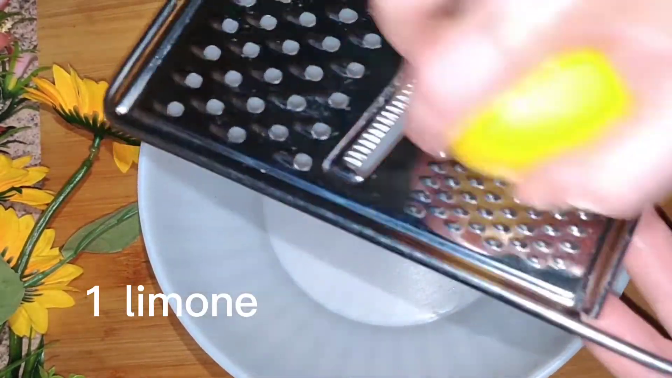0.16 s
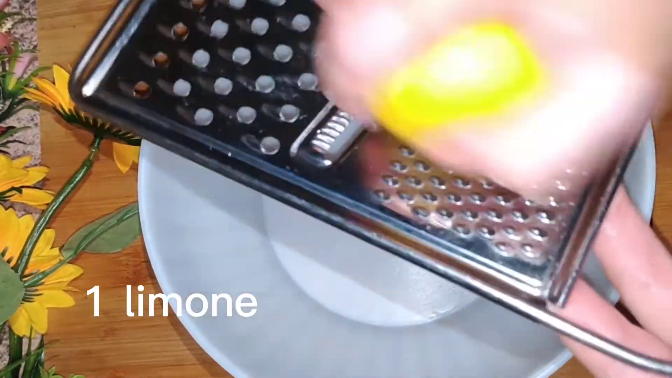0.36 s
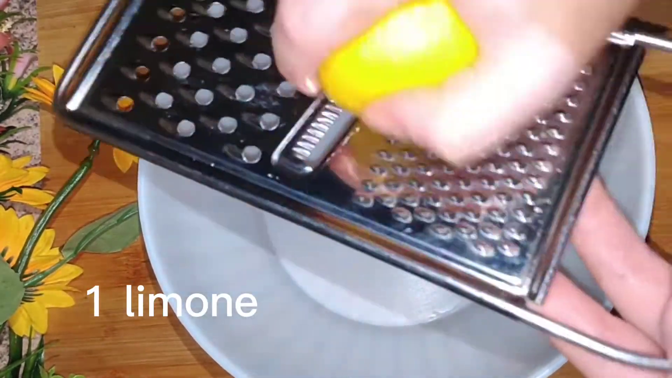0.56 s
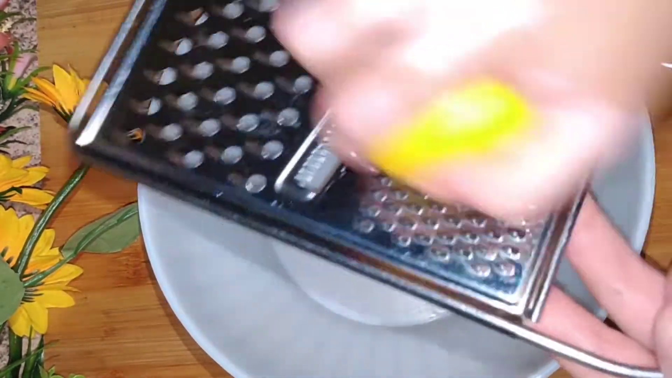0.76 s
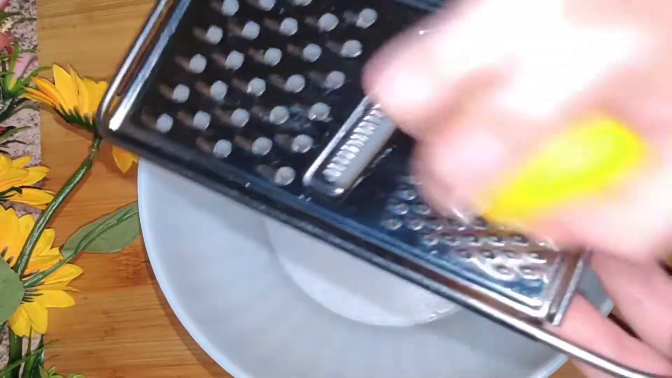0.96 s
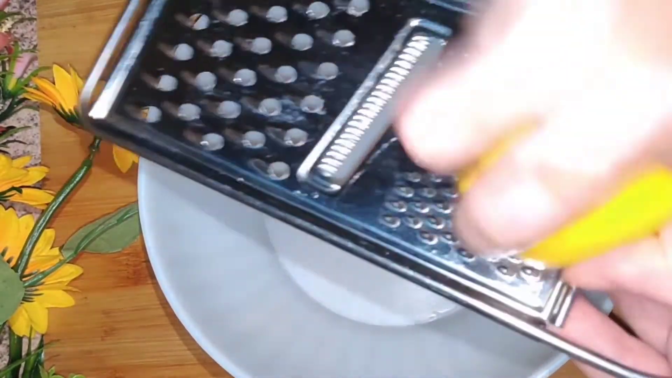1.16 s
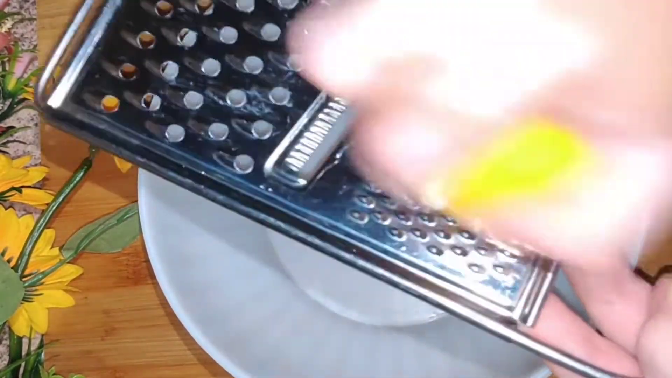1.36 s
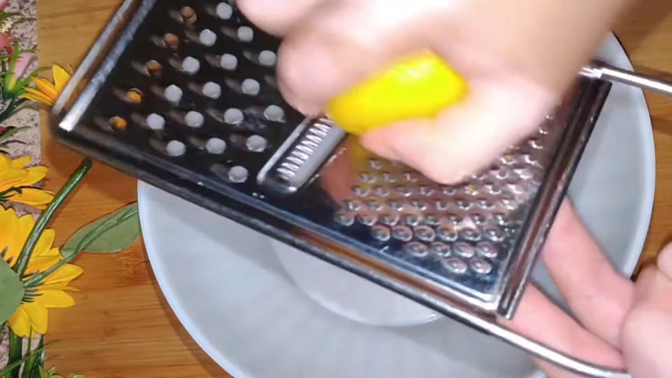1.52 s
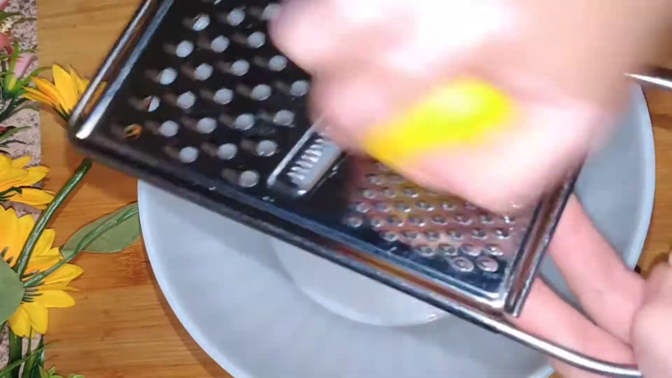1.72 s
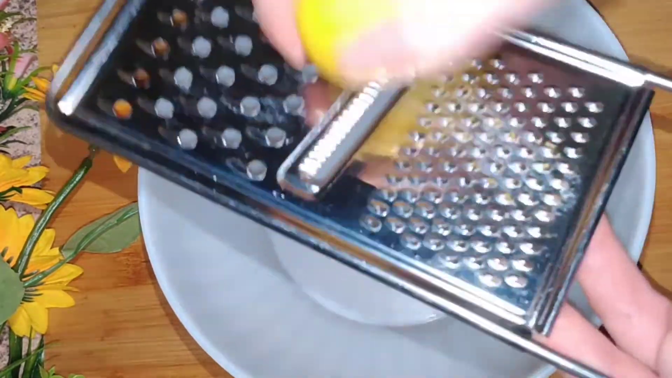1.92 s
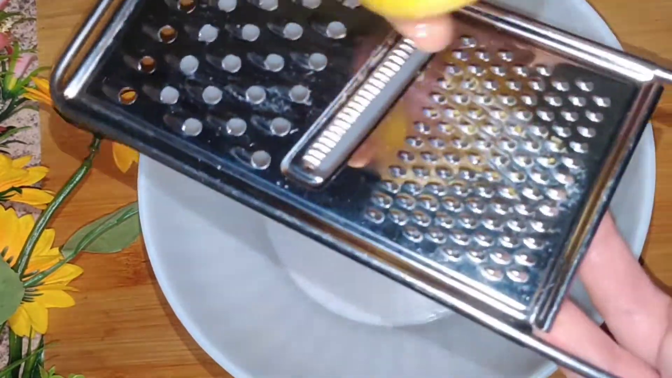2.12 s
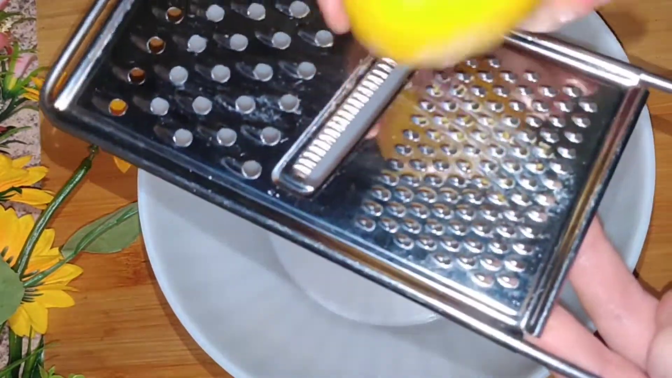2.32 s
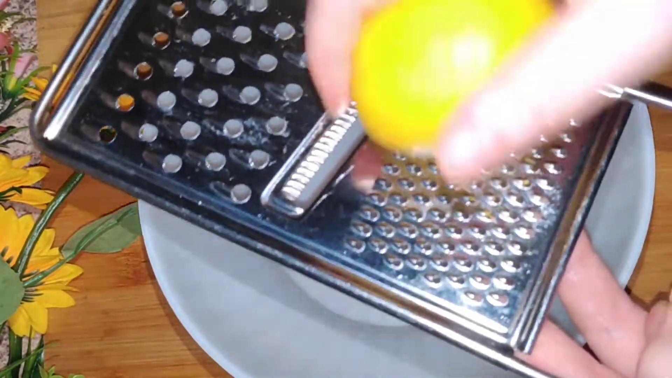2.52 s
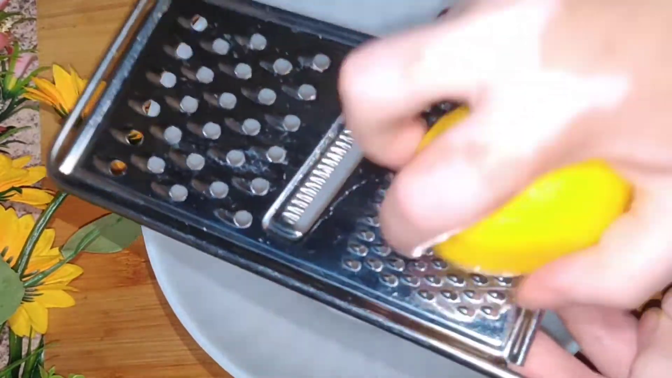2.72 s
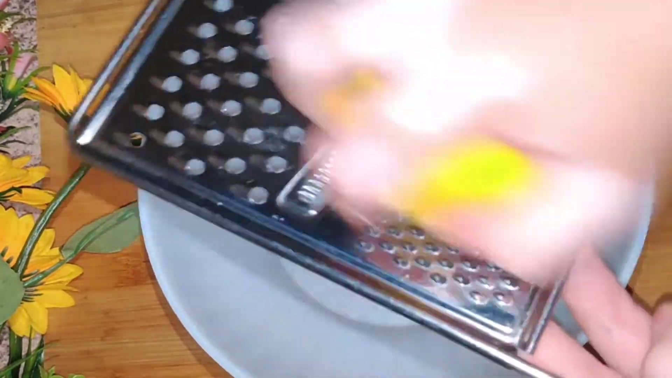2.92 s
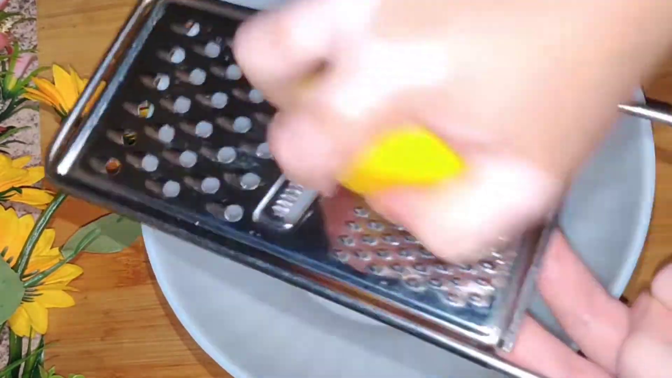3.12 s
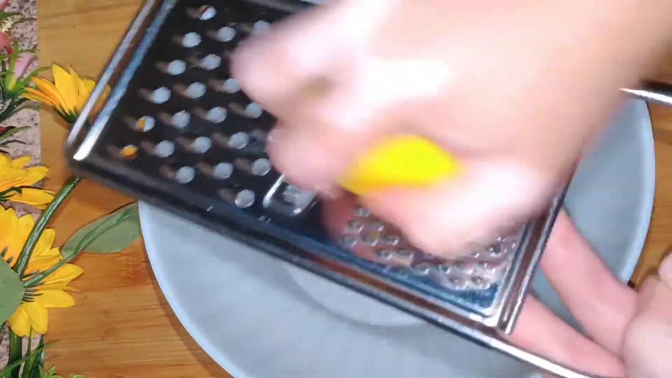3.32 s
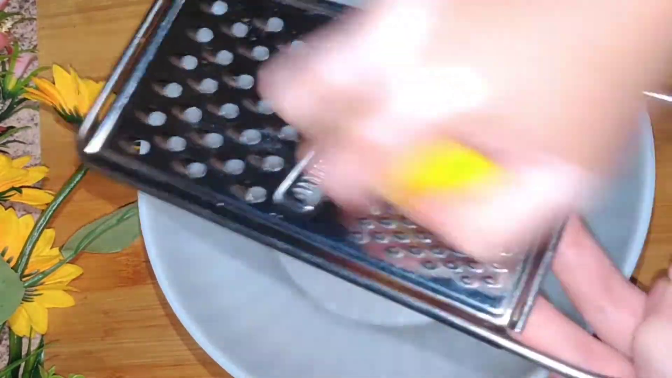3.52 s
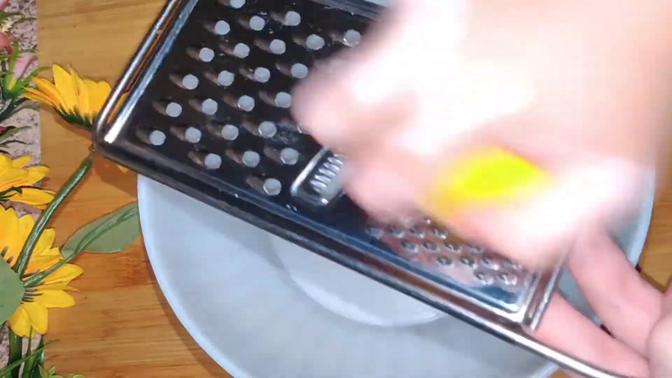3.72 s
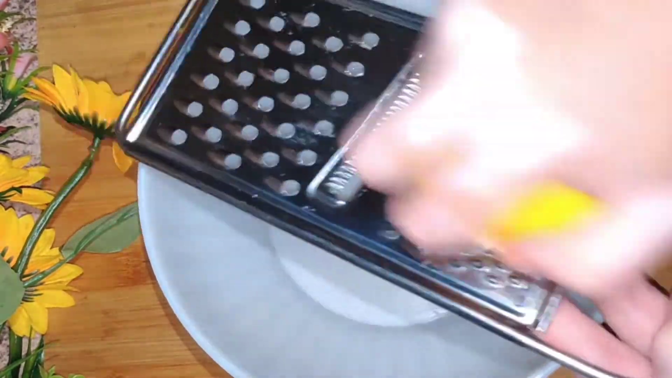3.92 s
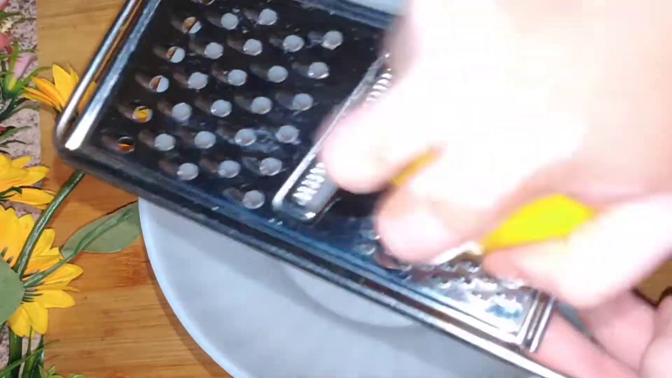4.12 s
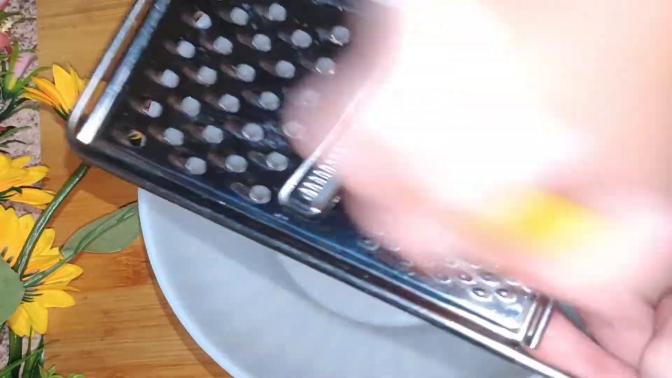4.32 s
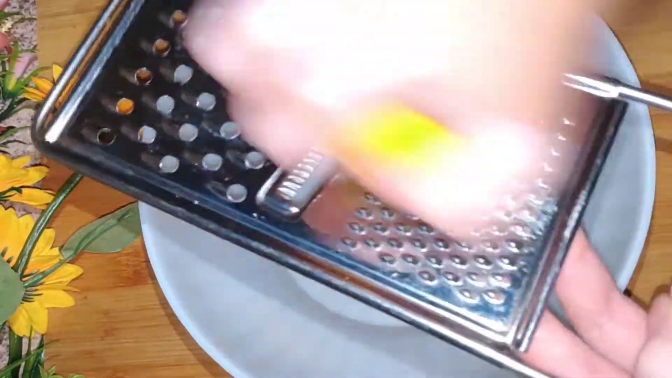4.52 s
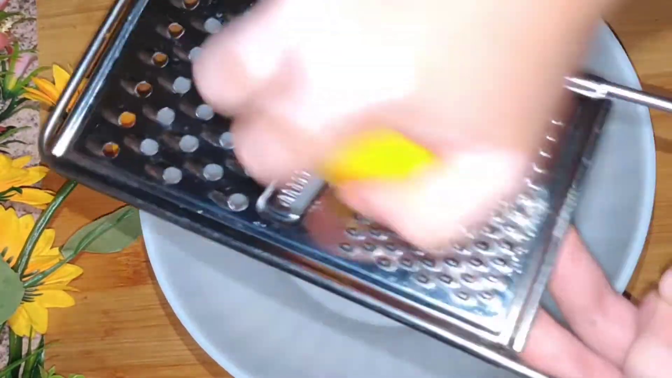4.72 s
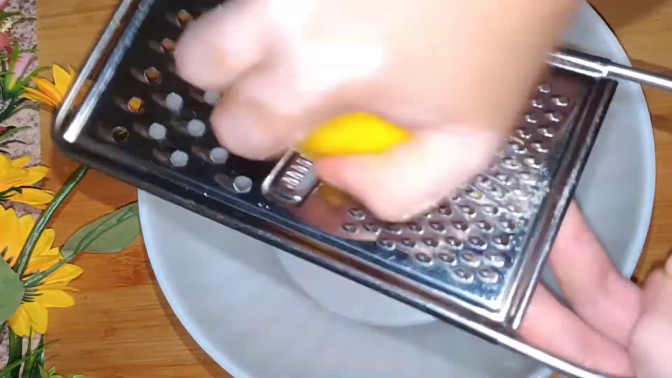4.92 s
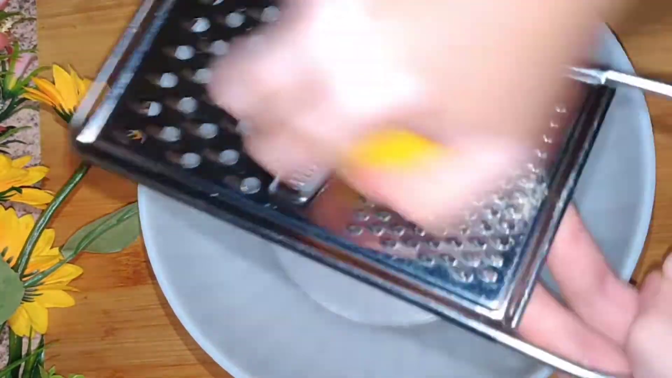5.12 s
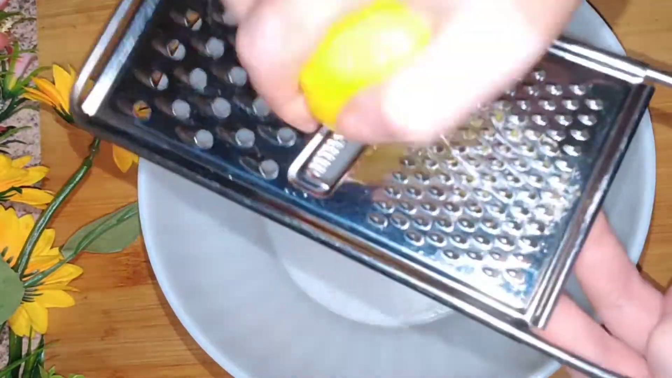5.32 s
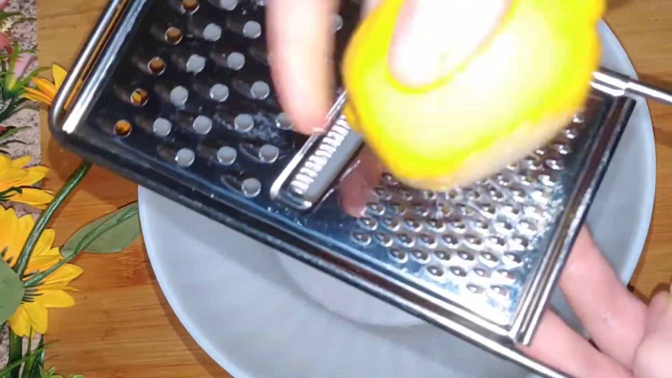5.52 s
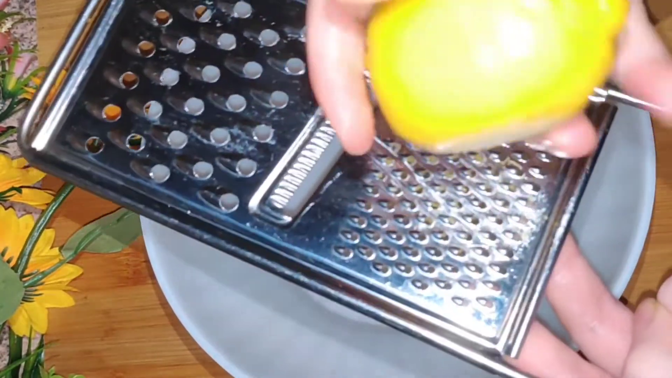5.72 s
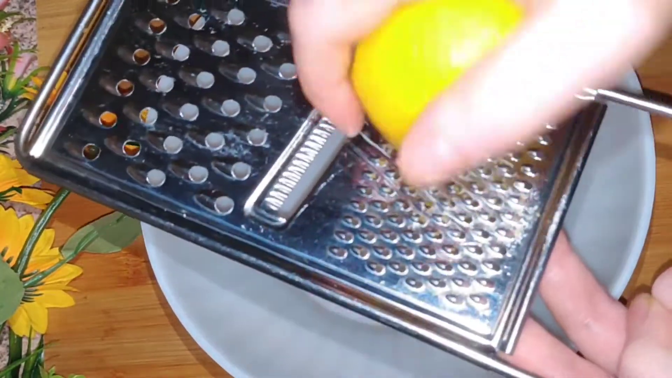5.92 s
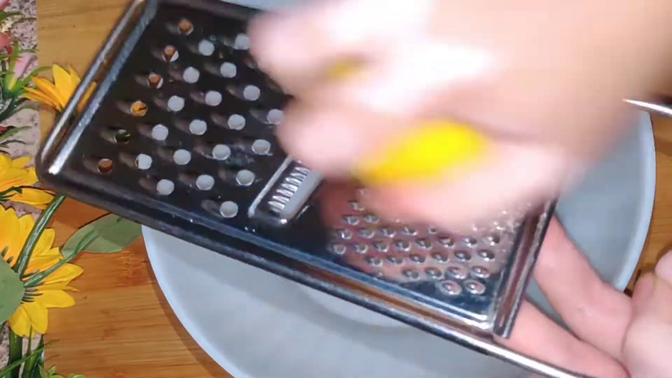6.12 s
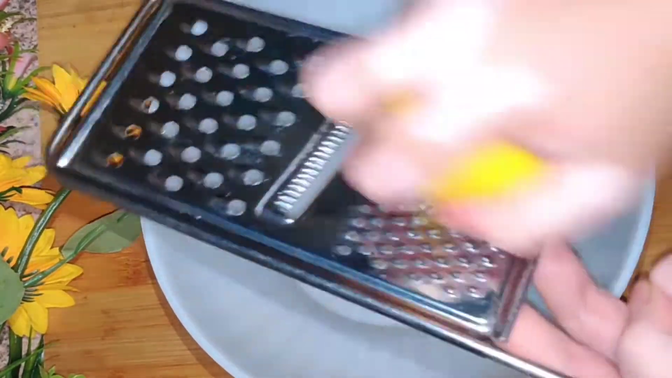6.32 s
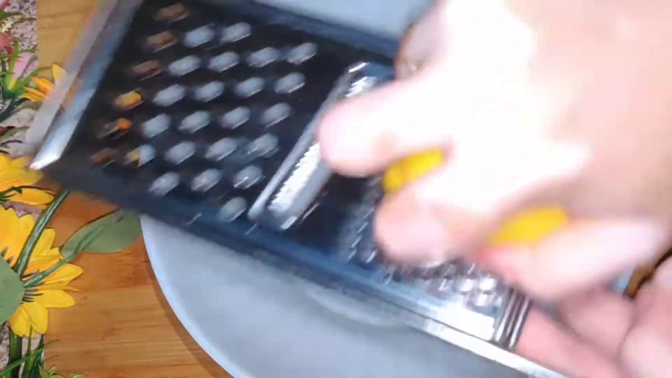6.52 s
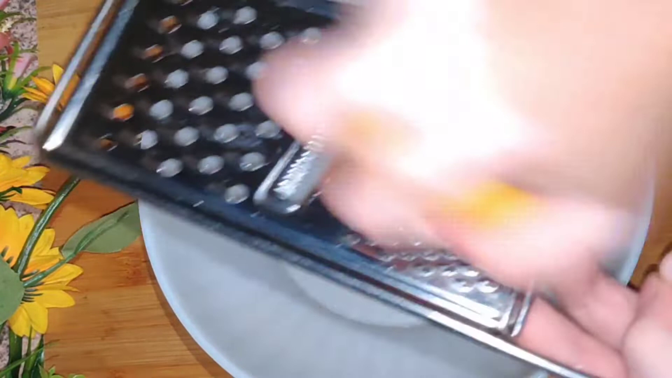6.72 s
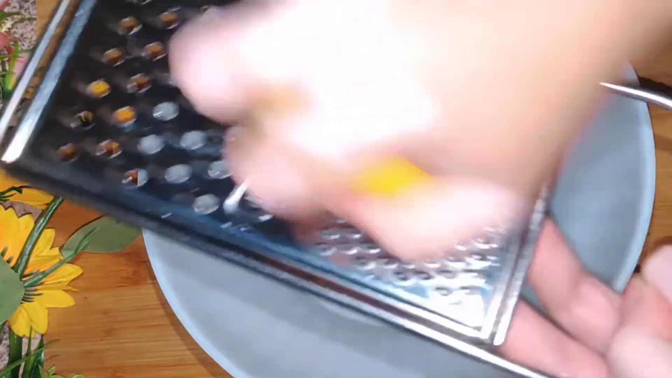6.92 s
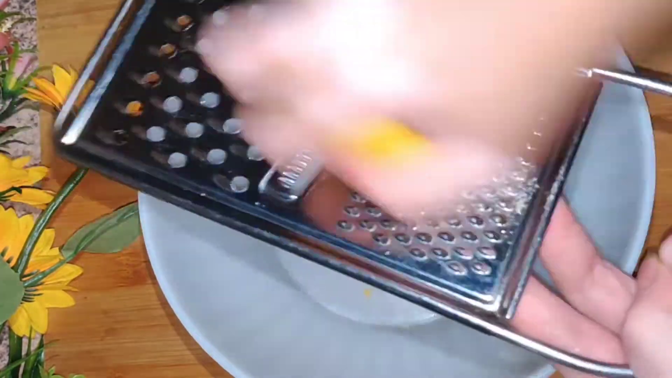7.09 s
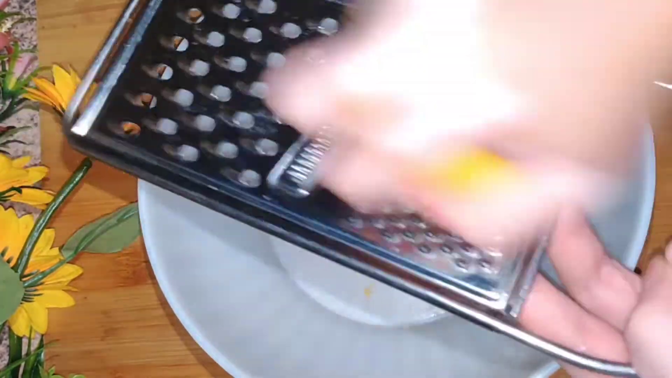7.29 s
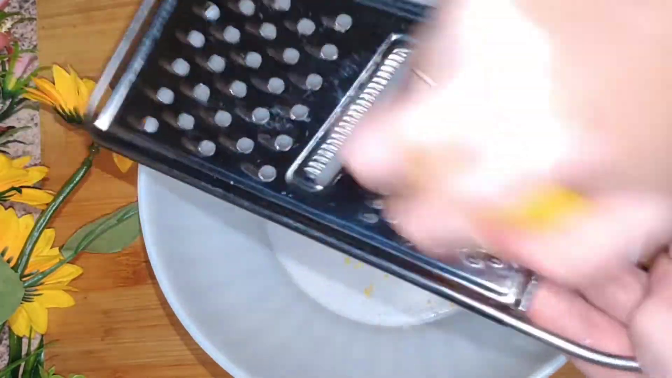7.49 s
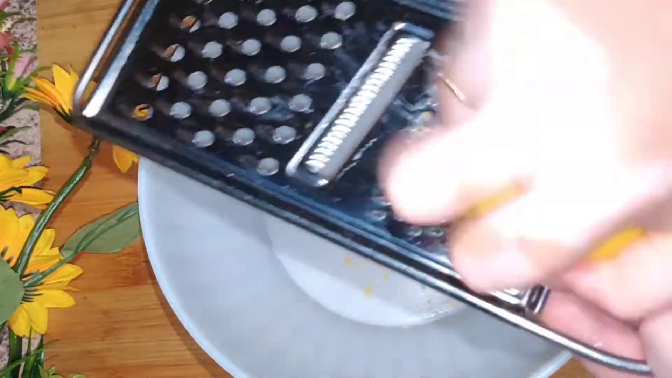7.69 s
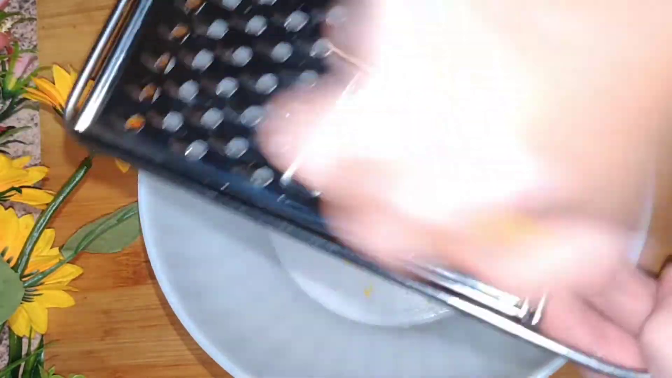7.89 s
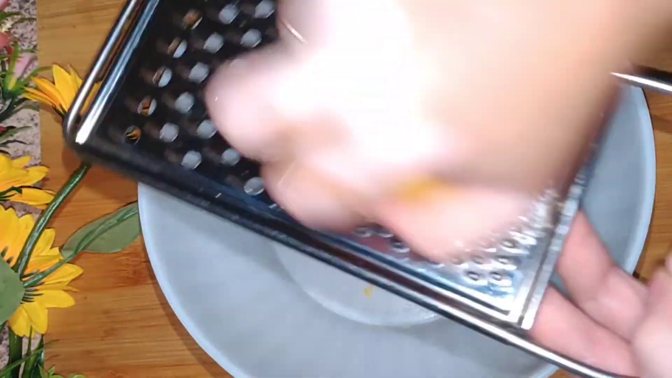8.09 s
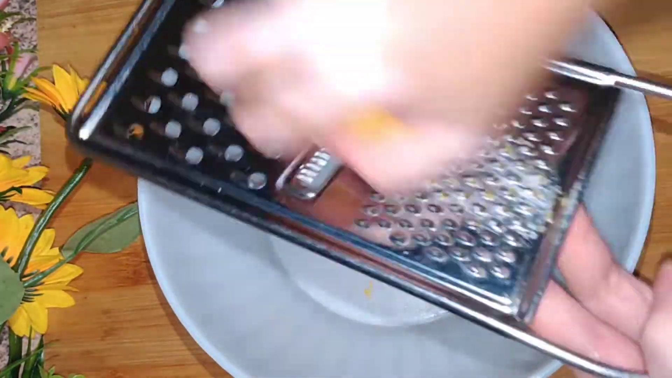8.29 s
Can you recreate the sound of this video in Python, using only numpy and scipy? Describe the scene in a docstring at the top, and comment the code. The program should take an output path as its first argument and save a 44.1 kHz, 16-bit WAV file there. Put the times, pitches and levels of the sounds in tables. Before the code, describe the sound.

A close stereo pickup in a small, quiet kitchen with faint air and rumble. At 0.1 s a grater knocks a bowl with a hollow, damped clunk and tiny bounce. Short rasping pushes of lemon peel on thin steel follow, about four per second, faint at first and firmer by 1.8 s, each with a softer, duller pull back. The lemon lifts off with a fading hiss around 1.9 s. A pause holds one barely audible brush at 2.3 s. From 2.9 s a second run grows louder and crisper; a harder, brighter clunk interrupts at 4.04 s, and it stops near 5.25 s with a very faint lift. Small metallic ticks and a faint brush fall between 5.35 and 5.8 s. A barely audible knock at 6.1 s precedes the third run, from 6.2 s, which quickly strengthens and continues steadily, ending on a longer scrape at 8.3 s. Soft low bumps underlie the strokes.

```python
"""A lemon is rubbed on a flat steel grater held over a bowl, in three quick runs, in a small kitchen.
A knock of grater on bowl opens the first run; each push tears the peel on the teeth in bursts of random snaps,
brighter the harder it presses, and just past halfway to the next push the pull drags it lightly back.
The lemon lifts off with a hiss after the first run, a harder knock interrupts the second, a fainter lift ends it;
soft brushes fall in the pauses, small ticks in the second one, and a very faint knock comes before the third run."""
import sys
import numpy as np
from scipy import signal
from scipy.fft import rfft, irfft, next_fast_len
from scipy.io import wavfile
from scipy.ndimage import map_coordinates

SR = 44100
rng = np.random.default_rng(int(sys.argv[2]) if len(sys.argv) > 2 else 0)


def digitize_waveform(pressure):
    """Quantize a signal to 16-bit integers and store it at the path in sys.argv[1].

    Rows of a 2-D input are taken as channels; values are limited to [-1, 1].
    """
    field = np.atleast_2d(pressure).T
    bounded = np.clip(field, -1, 1)
    quanta = np.round(bounded * 32767).astype(np.int16)
    wavfile.write(sys.argv[1], SR, quanta)


N = 368235

# pushes against the teeth, before any trim: (start t/s, length/s, level/dB)
PUSH_STROKES = [(.122, 0.056, -41), (.374, 0.057, -38.5), (0.615, 0.061, -35.5), (0.855, 0.081, -33),
                (1.113, 0.069, -31), (1.349, 0.063, -29), (1.568, 0.066, -28.5), (1.803, 0.075, -26.5),
                (2.898, 0.07, -36.5), (3.142, 0.066, -32), (3.372, 0.072, -28), (3.618, 0.059, -27),
                (3.838, .057, -26), (4.05, 0.068, -25), (4.282, 0.065, -24.5), (4.506, 0.064, -22.5),
                (4.745, 0.059, -25.5), (4.965, .067, -23.5), (5.184, 0.062, -25), (6.205, 0.078, -37),
                (6.435, 0.038, -34), (6.675, 0.068, -29), (6.911, .07, -28.5), (7.155, 0.056, -24),
                (7.382, 0.063, -26.5), (7.61, 0.05, -24.5), (7.84, 0.066, -25), (8.085, 0.065, -24.5),
                (8.323, 0.14, -24)]
PAUSE_S = 0.4  # a longer gap between pushes is a pause between runs


def amp(db):
    """Decibels to gain."""
    return 10 ** (np.asarray(db) / 20)


def unit(x):
    """Scale to rms 1."""
    return x / np.sqrt(np.mean(x ** 2) + 1e-20)


def along(points, hz):
    """(f/Hz, value) points read on a log frequency axis."""
    f, v = np.transpose(points)
    return np.interp(np.log(hz + 1), np.log(f + 1), v)


def filtered(x, response):
    """Shape the spectrum of x by a response of frequency."""
    n = x.shape[-1]
    m = next_fast_len(n + 4096)
    spectrum = rfft(x, m) * response(np.fft.rfftfreq(m, 1 / SR))
    return irfft(spectrum, m)[..., :n]


def wobble(rate, size):
    """A smooth random curve, rate knots a second."""
    return map_coordinates(rng.standard_normal(1024), [np.arange(size) * rate / SR], mode="wrap")


def add(track, s, sound):
    """Mix a sound into the track at s seconds."""
    room = track[:, max(round(s * SR), 0):][:, :sound.shape[-1]]
    room += sound[..., :room.shape[-1]]


def widen(pair, alike):
    """Blend two unrelated signals into left and right of a given likeness."""
    def mid_side_gains(hz):
        turn = np.arccos(np.clip(along(alike, hz), -1, 1)) / 2
        return np.array([np.cos(turn), np.sin(turn)])

    mid, side = filtered(pair, mid_side_gains)
    return np.array([mid + side, mid - side])


def air(db=-64.5):
    """Still kitchen air: faint room rumble and hiss from coloured noise."""
    # colour of the air: (f/Hz, relative level per Hz/dB)
    air_colour = [(12, -38.5), (20, 1.5), (59, -4), (76, -9), (166, -17), (252, -16.5), (382, -23),
                  (427, -17.5), (478, -22), (1070, -24.5), (1200, -29.5), (3000, -24.5), (15500, -32)]
    pair = widen(rng.standard_normal((2, N)), [(60, 0.55), (400, 0.29), (2000, 0.07)])
    noise = unit(filtered(pair, lambda hz: amp(along(air_colour, hz))))
    return amp(db + 0.28 * wobble(4.63, N)) * noise


def kitchen(x, gap=0.0055):
    """Hard walls answer after a gap (s) with decaying noise; the lows ring longest."""
    # reverberation: (f/Hz, t60/s)
    decay_times = [(100, 0.69), (700, 0.54), (3000, 0.44), (6000, 0.5), (8500, 0.42), (15000, 0.57)]
    hz, t, z = signal.stft(rng.standard_normal((2, SR * 2 // 3)), SR, nperseg=256)
    fade = amp(-60 * t / along(decay_times, hz)[:, None])
    tail = signal.istft(z * fade, SR, nperseg=256)[1]
    tail = np.pad(tail / np.linalg.norm(tail[0]), ((0, 0), (round(gap * SR), 0)))
    return signal.fftconvolve(x, tail, axes=1)[:, :N]


def rumble(shake_db=-40, shake_width=0.024, puff_db=-28, puff_width=0.016, turn_lead=0.025):
    """The table shakes; each time the hand turns for a push it sends a soft puff of air and jogs the grater."""
    # low shakes of the table and hands: (t/s, level/dB, t60/s)
    thuds = [(0.104, -47.5, 0.5), (4.04, -42.5, 0.75), (5.222, -48.5, 0.27), (6.14, -58, 2.7),
             (6.22, -64, 0.6)]
    # colour of the soft bumps of hands and table: (f/Hz, relative level per Hz/dB)
    bump_colour = [(8, -48), (20, -2), (32, -11.5), (52, -2), (72, -23), (110, -20), (200, -24.5),
                   (500, -64)]
    t = np.arange(N) / SR
    thud_power = sum((t > s) * amp(2 * (db - 60 * np.abs(t - s) / t60)) for s, db, t60 in thuds)
    puffs, shakes = np.zeros(N), np.zeros(N)
    for start, _, db in PUSH_STROKES:
        near = np.abs(t - start) < PAUSE_S / 2
        since = t[near] - start + turn_lead  # the hand turns shortly before the push
        spread = (since / puff_width / 2) ** 2
        # one pressure swell with a dip on either side
        puffs[near] += amp(db + puff_db + rng.normal(0, 2)) * (1 - spread) * np.exp(-spread * 2)
        shakes[near] += amp(db + shake_db) * np.exp(-(since / shake_width) ** 2)
    pair = widen(rng.standard_normal((2, N)), [(50, 0.98)])
    noise = unit(filtered(pair, lambda hz: amp(along(bump_colour, hz))))
    return (noise * np.sqrt(thud_power + shakes ** 2) + puffs) * amp([[1.2], [-1.2]])


def knocks(crack_db=-12, crack_t60=0.036, crack_hz=5000, attack=0.0013, lag=0.00012, bounce=0.0087,
           bounce_db=-10):
    """The frame meets the bowl: a hollow clunk with a short crack on top, then a light bounce."""
    # grater knocks bowl: (t/s, level/dB, hardness/dB per octave; the crack gains the same number of dB)
    hits = [(0.1019, -19.5, 4.5), (4.039, -13.5, 7), (6.114, -57.5, -11)]
    # modes of grater on bowl, damped by the hand: (f/Hz, level before hardness/dB, t60/s)
    clunk_modes = [(384, -15, 0.073), (465, -8.5, 0.038), (645, -4.5, 0.048), (736, 1, 0.03),
                   (830, -7, 0.023), (906, -19.5, 0.054), (1083, -11.5, 0.029), (1354, -10, 0.02),
                   (1495, -33.5, 0.017), (2005, -22, 0.04), (2330, -25, 0.041), (2850, -27, .05)]
    out, t = np.zeros((2, N)), np.arange(SR // 3) / SR
    late = np.maximum(t - np.array([[lag], [0]]), 0)  # it reaches the right side first
    for s, db, hard_db in hits:
        ring = np.zeros((2, len(t)))
        for hz, level, t60 in clunk_modes:
            # a harder contact feeds the upper modes
            mode_db = level + hard_db * np.log2(hz / 700) + rng.normal(0, 0.68)
            ring += amp(mode_db - 60 * late / t60) * np.sin(2 * np.pi * hz * late)
        ring *= 1 - np.exp(-late / attack)
        noise = rng.standard_normal((2, len(t)))
        crack = filtered(noise, lambda hz: 1 / (1 + (hz / crack_hz) ** 2))
        crack *= amp(crack_db + hard_db - 60 * t / crack_t60)
        add(out, s, amp(db) * (ring + crack))
        add(out, s + bounce, amp(db + bounce_db) * ring)
    return out * amp([[-1.5], [1.5]])


def steel(snaps, bright_db, ring_t60, ring_db, body_db=0, body_hz=1100, slide_rate=45, count=5, size=768):
    """Snaps spread through the sheet: a click, then a very short ring that is different at every spot."""
    # colour of peel tearing on the teeth: (f/Hz, relative level per Hz/dB)
    rasp_colour = [(30, -27), (100, -18.5), (170, -22), (380, -20), (560, -21.5), (1000, -16),
                   (2100, -13.5), (3100, -6.5), (5000, -4), (6500, -2), (7200, -6), (8400, -13.5),
                   (10500, -17), (15500, -20.5)]
    # resonances of the steel sheet: (f/Hz, width/Hz, lift/dB)
    sheet_modes = [(383, 96, 8), (762, 92, 6), (1370, 69, 6.5), (1943, 39, 6.5), (2270, 120, 4),
                   (2737, 100, 5.5), (3274, 97, 3), (3904, 60, 5), (4420, 37, 5)]
    # left-right balance of the rasp, the right side much stronger near 6.8 kHz: (f/Hz, left minus right/dB)
    side_balance = [(100, 9), (320, 5), (520, 3.5), (680, -3), (830, -6.5), (1060, 3.5), (1500, -3),
                    (2000, 0.5), (4200, -.5), (5200, 3.5), (6800, -10), (8500, -3.5), (11000, -2),
                    (15000, -1)]
    # left-right likeness: (f/Hz, correlation)
    likeness = [(100, 0.71), (400, 0.95), (1400, 0.28), (3000, 0.25), (8000, 0.16), (15000, 0.13)]
    # the sheet's body modes reach the right side first: (f/Hz, phase lead/rad)
    right_lead = [(300, 0), (500, 0.59), (750, 1), (1350, 0.84), (1900, 0.27), (3000, 0.61), (6000, 0.093)]
    n = len(snaps)
    ring = rng.standard_normal((count, 2, size)) * amp(-60 * np.arange(size) / SR / ring_t60)
    ring *= amp(ring_db) / np.linalg.norm(ring, axis=2, keepdims=True)
    ring[..., 0] += rng.choice([-1, 1], (count, 2))  # the click
    # the lemon covers a few spots at once and slides on to the next ones (slide_rate spots a second)
    spot = (rng.uniform(0, count - 2, n) + slide_rate * np.arange(n) / SR).astype(int) % count
    shares = snaps * (spot == np.arange(count)[:, None])
    pair = signal.fftconvolve(shares[:, None], ring, axes=2).sum(0)[:, :n]

    def colour(hz):
        modes = sum(db / (1 + (2 * (hz - centre) / width) ** 2) for centre, width, db in sheet_modes)
        tilt = bright_db * np.log2(np.clip(hz, 1200, 8000) / 4000)  # dB per octave
        body = body_db / (1 + (hz / body_hz) ** 2)
        sides = np.outer([0.5, -0.5], along(side_balance, hz))
        delay = np.exp(-1j * np.outer([1, 0], along(right_lead, hz)))
        return delay * amp(along(rasp_colour, hz) + modes + tilt + body + sides)

    return filtered(widen(pair, likeness), colour)


def ticks(size=4096):
    """Small ticks as the lemon is turned in the hand: single snaps on the sheet."""
    # ticks: (t/s, peak level/dB, brightness/dB per octave)
    turns = [(5.355, -53, -4), (5.405, -44.5, -8.5), (5.504, -63.5, -21), (5.57, -55.5, 2),
             (6.115, -47, 1.5)]
    out = np.zeros((2, N))
    for s, db, bright_db in turns:
        sound = steel(signal.unit_impulse(size, "mid"), bright_db, ring_t60=0.025, ring_db=14.5)
        add(out, s - size / 2 / SR, amp(db) * sound / np.abs(sound).max())
    return out


def stroke(length, swell_db, bright_db, body_db, rise, fall, snap_rate, spread_db, catch_db,
           catch_rate=280, grip_db=1.7, grip_rate=70, size=9000):
    """One pass over the teeth: peel cells snap at random, in clumps as rows of teeth catch and let go."""
    early = 0.035  # s of room for the onset
    t = np.arange(size) / SR - early
    pressure = (1 + np.tanh(t / rise)) * (1 + np.tanh((length - t) / fall)) / 4
    pressure *= amp(swell_db * (np.clip(t / (length + 1 / SR), 0, 1) - 0.5))
    snaps = (rng.random(size) < snap_rate / SR) * rng.choice([-1, 1], size)
    snaps = snaps * amp(spread_db * np.clip(rng.standard_normal(size), -2, 2))
    # the peel gives way before any catch grows large
    catch = catch_db * np.tanh(wobble(catch_rate, size))
    grip = grip_db * np.tanh(wobble(grip_rate, size))
    snaps *= amp(catch + grip)
    sound = steel(snaps * pressure, bright_db, body_db=body_db, ring_t60=0.015, ring_db=2.0)
    return -early, unit(sound) * np.sqrt(np.mean(pressure ** 2))


def lift(start, db):
    """The lemon leaves the teeth and the freed sheet hisses out."""
    early, sound = stroke(0, swell_db=0, bright_db=2.5, body_db=-4, rise=0.0113, fall=0.123,
                          snap_rate=5000, spread_db=2.5, catch_db=1.5, size=18000)
    return start + early, amp(db) * sound


def drag(start, length, db):
    """The peel slides over the backs of the teeth: soft, duller and hollower."""
    early, sound = stroke(max(length, 0.01), swell_db=3.4, bright_db=0, body_db=3.5, rise=0.011, fall=0.017,
                          snap_rate=5200, spread_db=1.0, catch_db=1.0)
    return start + early, amp(db) * sound


def push(start, length, db, firm_db=-23):
    """The peel is driven against the cutting edges: more force bites faster and sounds brighter."""
    force_db = db - firm_db  # against a firm push
    # the rasp slowly brightens as the grating goes on
    crisper_db = 0.056 * (start - N / SR / 2)
    bright_db = 0.37 + 0.037 * force_db + crisper_db  # dB per octave
    bite_s = 0.0073 * np.exp(-0.035 * force_db)
    early, sound = stroke(max(length, 0.01), swell_db=0.3, bright_db=bright_db, body_db=-0.5, rise=bite_s,
                          fall=0.016, snap_rate=5000, spread_db=2.0, catch_db=0.75)
    return start + early, amp(db) * sound


def grating(push_trim_db=0.24, pull_from=0.515, pull_to=0.78):
    """Push and pull alternate within a run, the pull at set shares of the cycle; lifts and brushes join in."""
    # weight of the hand on the way back: (t/s, level of a pull/dB)
    pull_weight = [(.25, -57), (.75, -47), (1.7, -44.5), (3.02, -51), (3.5, -47.5), (4.42, -37.5),
                   (5.1, -37.5), (6.31, -49.5), (6.56, -55.5), (6.8, -44.5), (7.52, -37.5), (8.2, -39)]
    # the lemon lifts off at the end of a run: (t/s, level/dB)
    lift_offs = [(1.88, -39.5), (5.25, -55.5)]
    # the lemon brushes the teeth in the pauses: (start t/s, length/s, level/dB)
    brushes = [(2.317, 0.049, -68), (5.658, .13, -70.5)]
    out = np.zeros((2, N))
    for start, length, db in PUSH_STROKES:
        add(out, *push(start, length, db + push_trim_db))
    for (start, _, _), (next_start, _, _) in zip(PUSH_STROKES, PUSH_STROKES[1:]):
        cycle = next_start - start
        if cycle < PAUSE_S:
            back = start + pull_from * cycle
            weight_db = np.interp(back, *np.transpose(pull_weight))
            add(out, *drag(back, (pull_to - pull_from) * cycle, weight_db))
    for start, db in lift_offs:
        add(out, *lift(start, db))
    for start, length, db in brushes:
        add(out, *drag(start, length, db))
    return out


def scene(rasp_room_db=-13, knock_room_db=-9):
    """Grater and bowl close by, the kitchen behind them."""
    rasp = grating() + ticks()
    clunk = knocks()
    room = kitchen(amp(rasp_room_db) * rasp + amp(knock_room_db) * clunk)
    return rasp + clunk + room + rumble() + air()


def record(dry, top_hz=15600):
    """The recorder keeps nothing above its band limit."""
    return filtered(dry, lambda hz: hz < top_hz)


dry = scene()
out = record(dry)
digitize_waveform(out)
```